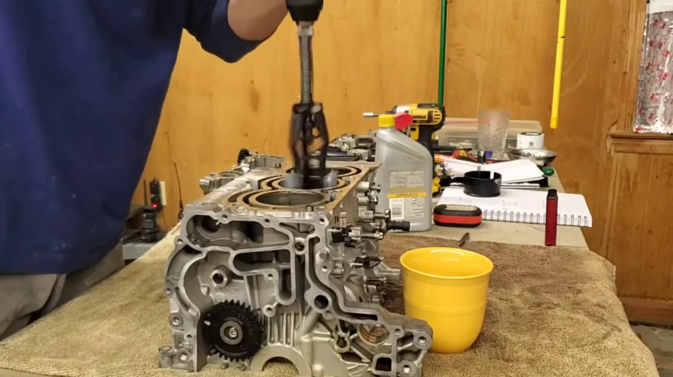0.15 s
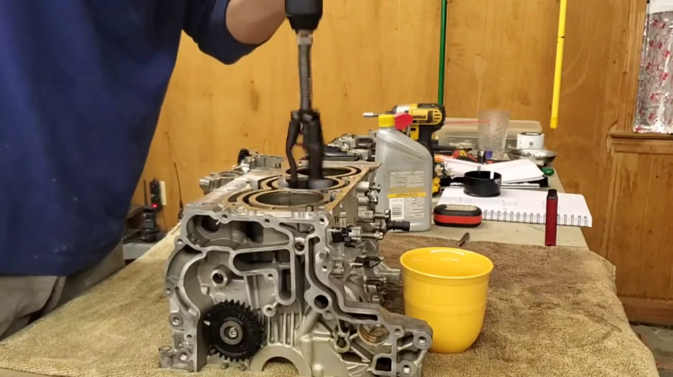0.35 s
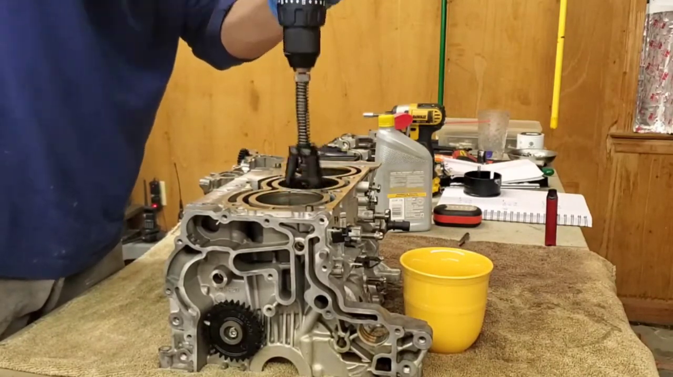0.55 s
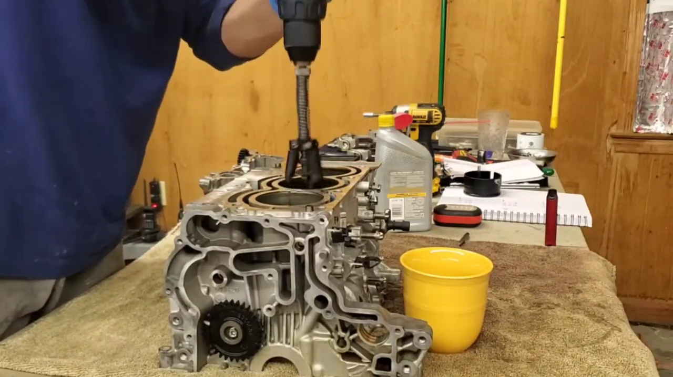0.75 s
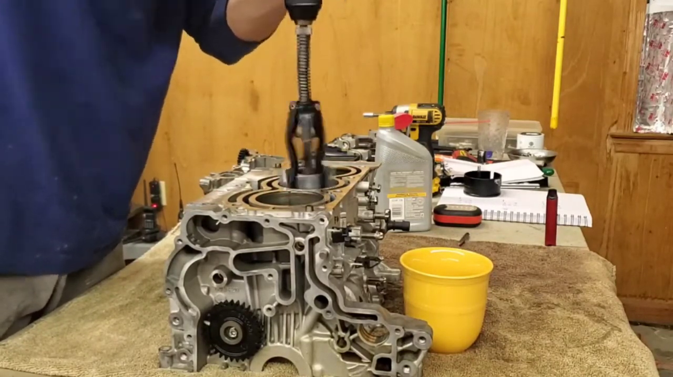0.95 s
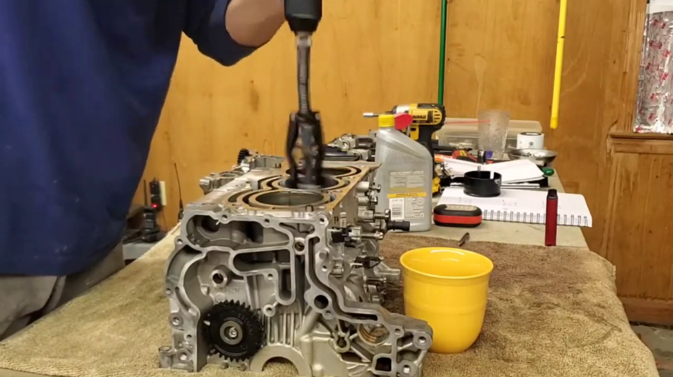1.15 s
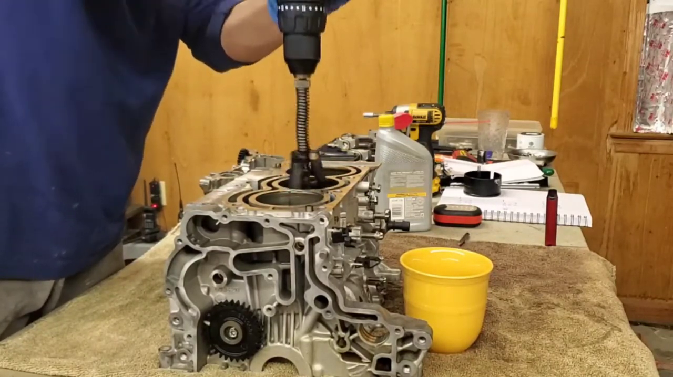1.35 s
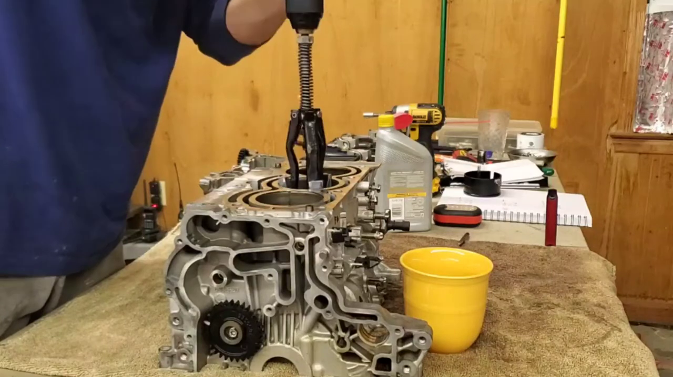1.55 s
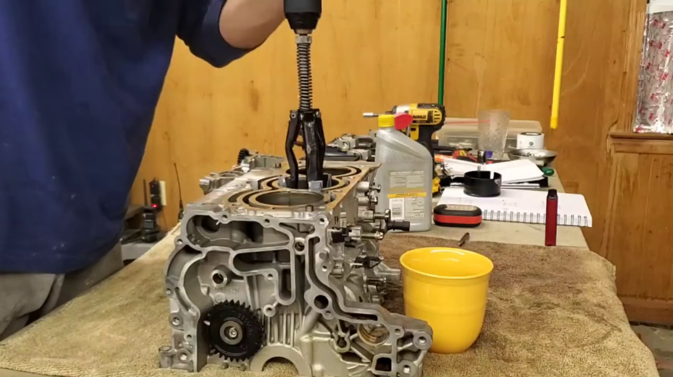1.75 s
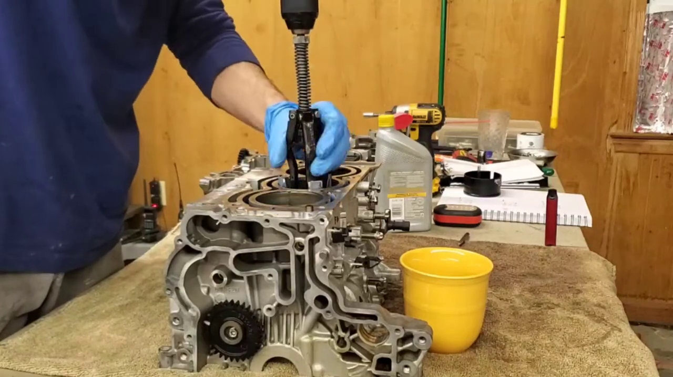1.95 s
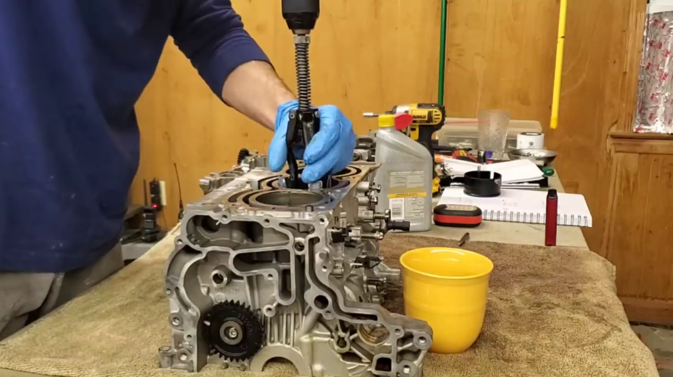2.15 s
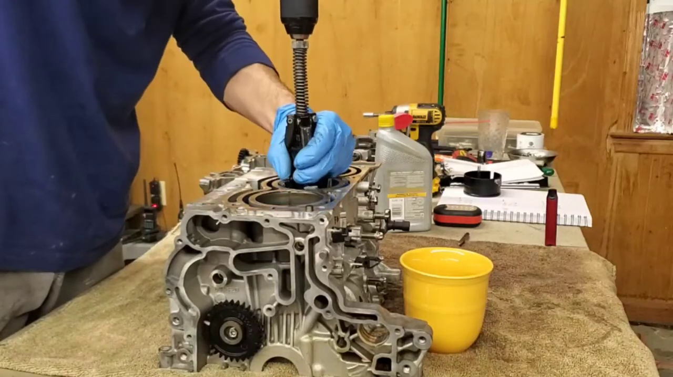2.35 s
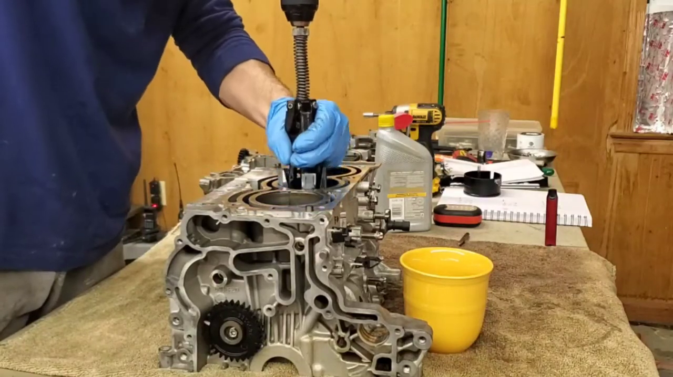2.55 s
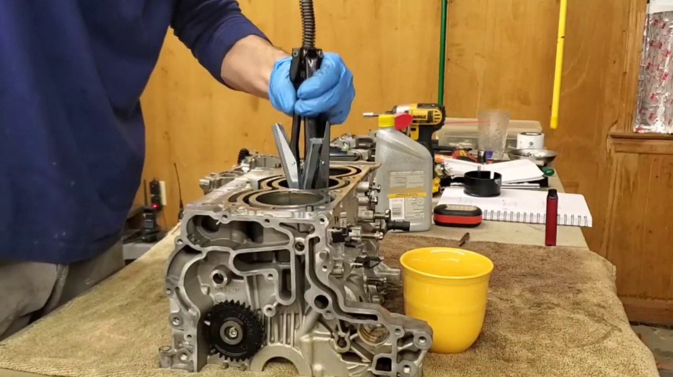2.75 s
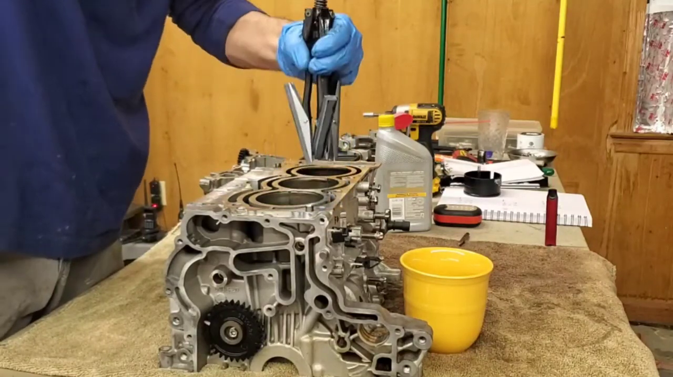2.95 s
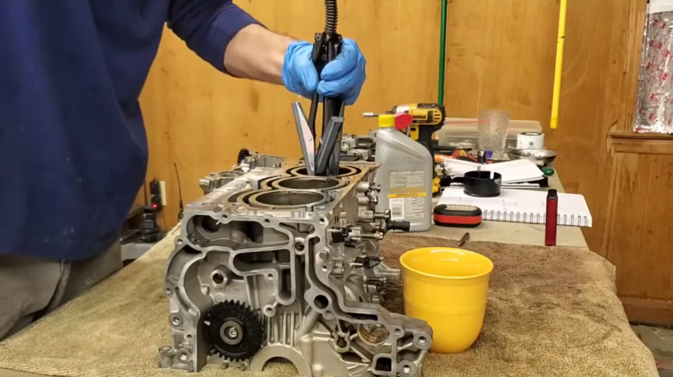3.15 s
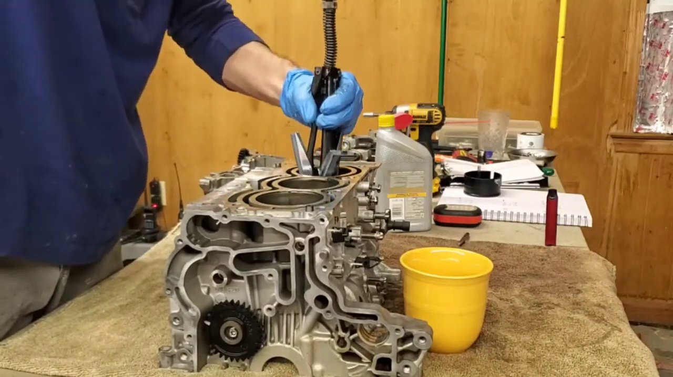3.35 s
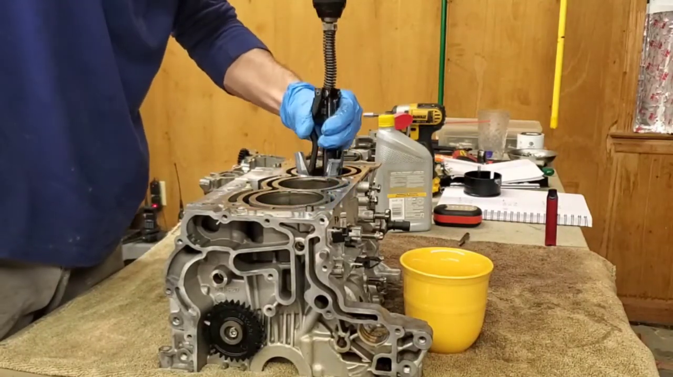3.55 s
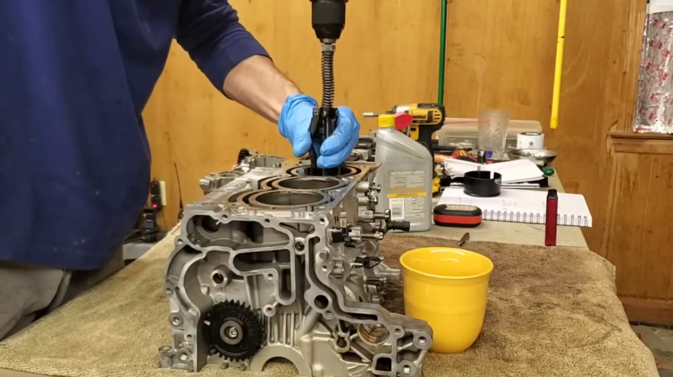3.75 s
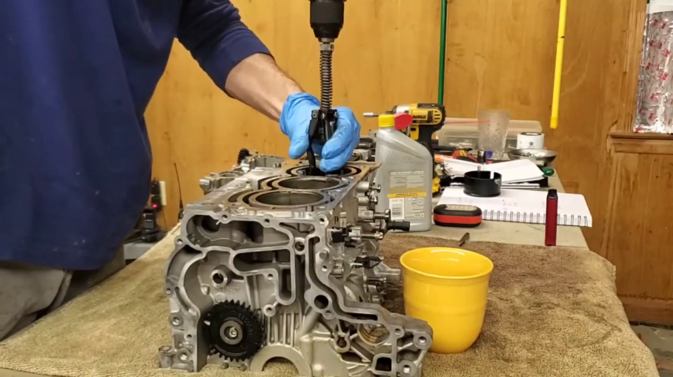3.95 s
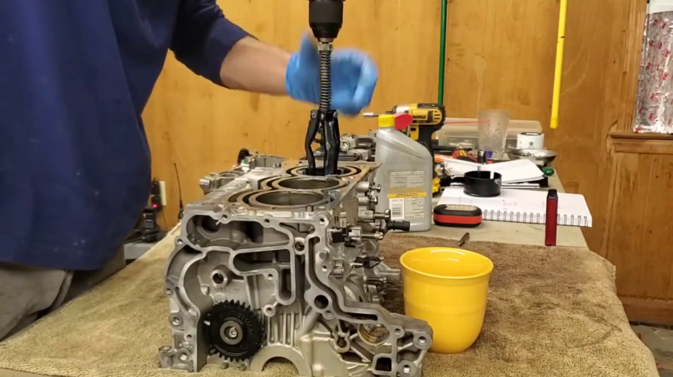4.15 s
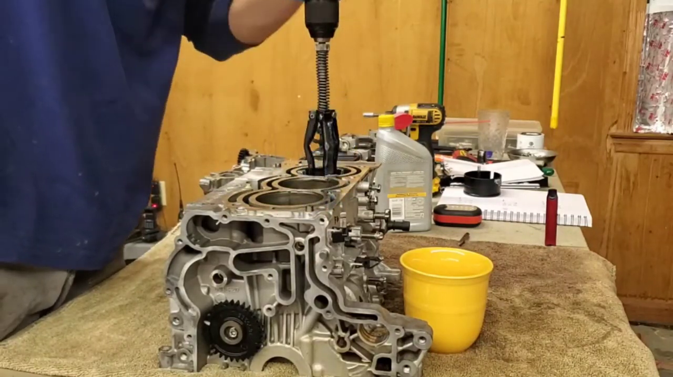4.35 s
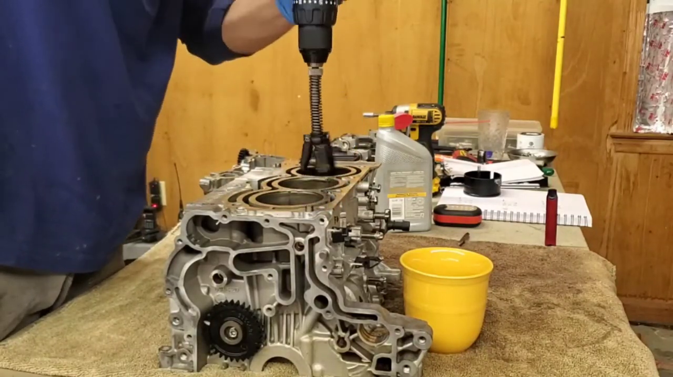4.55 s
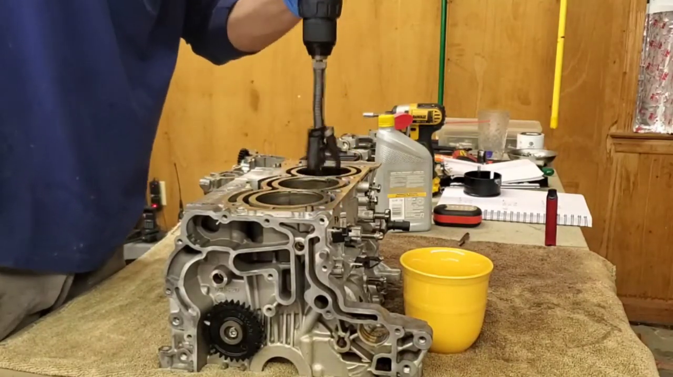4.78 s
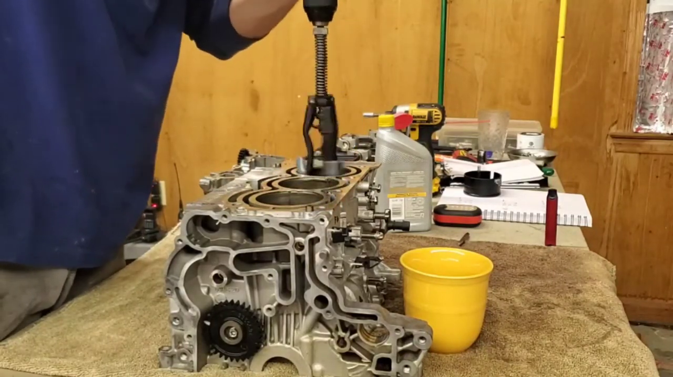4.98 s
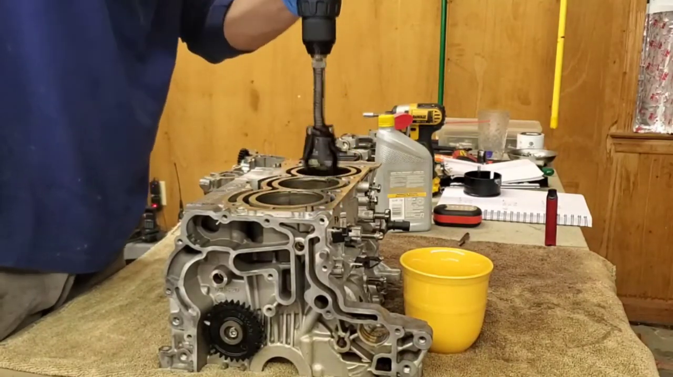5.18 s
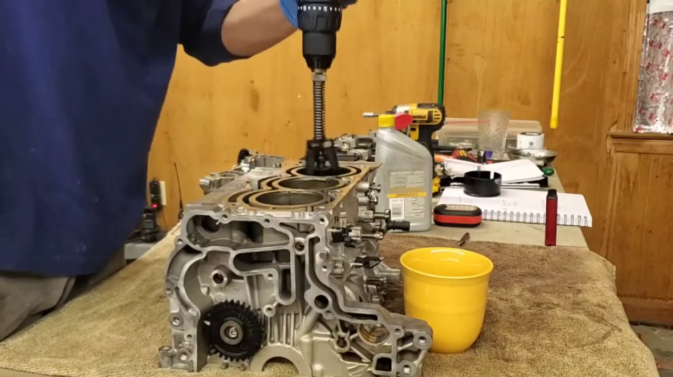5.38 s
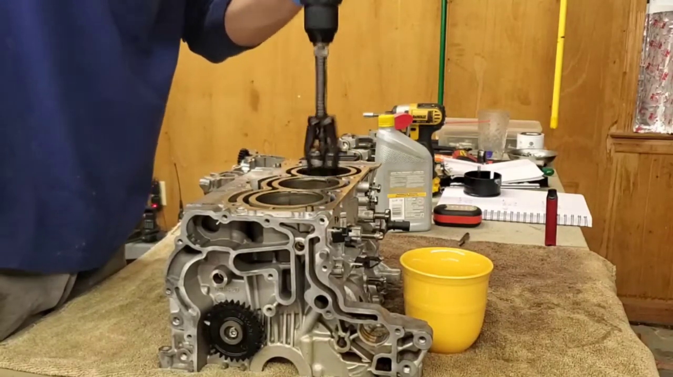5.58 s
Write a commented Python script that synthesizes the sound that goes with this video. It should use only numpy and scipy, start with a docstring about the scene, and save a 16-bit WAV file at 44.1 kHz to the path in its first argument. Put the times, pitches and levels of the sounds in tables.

```python
"""A cordless drill is already spinning a three-stone hone in an oiled cylinder bore: motor and gears whine,
swelling with each stroke, the stones grind in time with the chuck and now and then squeak.
The drill brakes; a gloved hand squeezes the sprung arms and moves the hone to the next bore with swishes,
hisses, steel knocks and a dull thump; then the drill starts again. Tones follow the motor's turns, rubbing
is shaped noise, and steel is a set of ringing modes. Mains hum fills the small workshop throughout."""
import sys
import numpy as np
from scipy import signal
from scipy.fft import rfft, irfft
from scipy.io import wavfile
from scipy.ndimage import uniform_filter1d

SR = 44100
rng = np.random.default_rng(int(sys.argv[2]) if len(sys.argv) > 2 else 0)


def transcribe(signal):
    """Save signal, clipped to [-1, 1], as a 16-bit WAV file at the path in sys.argv[1]."""
    frames = np.atleast_2d(signal).T
    limited = np.clip(frames, -1, 1)
    pcm = np.round(limited * 32767).astype(np.int16)
    wavfile.write(sys.argv[1], SR, pcm)


N = 247842
T = np.arange(N) / SR  # time in seconds

# how the steel arms of the hone ring when free: pitch_hz, relative level_db, time to fade by 60 dB t60_s
ARM_MODES = [(1340, -21, 0.31), (2547, -5, 0.076), (2720, -7.5, 0.069), (3840, -4, .06), (4256, 1.5, 0.071),
             (4370, -3.5, 0.068), (4660, 2, 0.047), (5260, -2, 0.033), (6520, -7, 0.064), (8130, 4, 0.039),
             (8370, -3.5, 0.063), (10940, -14, 0.075), (13190, -10, 0.048)]


def undb(db):
    """Decibels to gain."""
    return 10 ** (np.asarray(db) / 20)


def unit(x):
    """Scale to rms 1."""
    return x / np.sqrt(np.mean(x ** 2))


def noise():
    """White noise."""
    return rng.standard_normal(N)


def walk(rate):
    """A smooth random wander of rms 1, changing about rate times a second."""
    k = max(int(SR / rate), 2)
    steps = np.repeat(rng.standard_normal(N // k + 1), k)
    smooth = uniform_filter1d(uniform_filter1d(steps, k), k)
    return unit(smooth[:N])


def swell(start, length):
    """A rounded hump in time."""
    return np.sin(np.pi * np.clip((T - start) / length, 0, 1))


def colour(x, points):
    """Shape x with a spectrum of (Hz, dB) points, at rms 1."""
    hz, db = np.transpose(points)
    f = np.maximum(np.arange(N // 2 + 1) * SR / N, 1)
    gain = undb(np.interp(np.log(f), np.log(hz), db))
    return unit(irfft(rfft(x) * gain, N))


def tilted(points, tilt_db, pivot_hz):
    """A spectrum made brighter or duller by tilt_db per octave."""
    return [(hz, db + tilt_db * np.log2(hz / pivot_hz)) for hz, db in points]


def resonate(x, hz, width):
    """One resonance, gain 1 at its centre."""
    return signal.lfilter(*signal.iirpeak(hz, hz / width, fs=SR), x)


def narrow(x, hz, width):
    """A resonance applied twice for steep flanks, at rms 1."""
    return unit(resonate(resonate(x, hz, width), hz, width))


def grit(scatter_db, count=12):
    """Dense abrasive grains of very unequal size, each count samples long."""
    size = undb(scatter_db * np.minimum(rng.exponential(size=N // count + 1), 5))
    return unit(noise() * np.repeat(size, count)[:N])


def drill():
    """Shaft tones, gear lines and whine follow the motor; each stroke loads it and swings the tones past the listener."""
    # pulls of the trigger: on_s, off_s, motor turns per second full_hz, grinding level_db,
    # grinding rise in dB per s, shaft tone level_db, its octave level_db, whine level_db
    bursts = [(-0.2, 1.46, 382.3, -31, 0.63, -45.8, -45, -40),
              (4.376, 5.8, 389.3, -30, -0.3, -49.5, -45, -40)]
    # the hand pumps the hone up and down, one row per pull: a moment at the bottom_s, stroke period_s,
    # lag_s until the shaft tones are loudest, lobes of the whine passed per stroke (count)
    strokes = [(0.04, 0.277, 0.03, 4), (4.57, 0.287, 0.145, 3)]
    # motor and gear lines: multiple of the motor turn, level_db relative to the grinding, phase wander_rad
    gear_lines = [(0.45, -39, .5), (2.97, -28, 0.18), (3.953, -23.5, 0.13), (4.39, -22.5, 0.98),
                  (4.99, -14, .25), (8.674, -15.5, 0.99), (10.14, -22.5, 0.27), (10.75, -17.5, 0.8),
                  (15.58, -27.5, .4), (15.92, -30, .4), (23.22, -16.5, 0.44), (24.3, -28, 0.35),
                  (29.58, -26.5, 0.36), (36.1, -16, 0.18), (39.7, -21.5, .2)]
    sag_hz = 1.428  # the motor turns this much slower at the bottom of a stroke, faster at the top
    grind_law, shaft_law, whine_law = 0.79, 1.8, 12  # gains grow as these powers of the speed
    shaft_swing_db, octave_swing_db = 3, 2.5  # swells within a stroke
    whine_swing_db, whine_lobe_db, whine_flicker = 1.5, 3, 0.3
    # near full speed the stones are flung against the wall and grind louder
    fling_db, fling_law = 2.5, 7
    shaft_cut_hz = 170  # the small housing radiates little below this
    wander, whine_order = .13, 18  # phase wander in rad; whine cycles per motor turn

    burst = np.searchsorted([row[0] for row in bursts[1:]], T)
    on, off, full_hz, grind_db, rise_db, shaft_db, octave_db, whine_db = np.array(bursts)[burst].T
    bottom, period, lag, lobes = np.array(strokes)[burst].T
    speed = throttle(on, off)
    stroke = 2 * np.pi * (T - bottom) / period
    unsteady = 1 + .0007 * walk(60) + .0005 * walk(12)
    hz = speed * (full_hz - sag_hz * np.cos(stroke)) * unsteady
    turns = np.cumsum(hz) / SR

    def line(multiple, wander, flutter_db):
        """One tone locked to the motor, with a wandering phase and level."""
        tone = np.sin(2 * np.pi * multiple * turns + wander * walk(110))
        return np.sqrt(2) * tone * unit(undb(flutter_db * walk(25)))

    gears = sum(undb(db) * line(multiple, drift, flutter_db=3.0) for multiple, db, drift in gear_lines)
    facing = np.cos(stroke - 2 * np.pi * lag / period)
    shaft = undb(shaft_db + shaft_swing_db * facing) * line(1, wander, flutter_db=2.0)
    octave = undb(octave_db + octave_swing_db * facing) * line(2, wander, flutter_db=2.74)
    # the whine beams from the vents in lobes, the strongest at the bottom of the stroke
    beam = undb(whine_db + whine_swing_db * np.cos(stroke) + whine_lobe_db * np.cos(lobes * stroke))
    flicker = 1 + whine_flicker * walk(70)
    whine = beam * unit(line(whine_order, wander, flutter_db=2.04) * flicker)
    load_db = grind_db + rise_db * (T - on) - fling_db * (1 - speed ** fling_law)
    load = undb(load_db) * speed ** grind_law
    tones = load * speed * gears + speed ** shaft_law * (shaft + octave) + speed ** whine_law * whine
    housing = signal.butter(2, shaft_cut_hz, "high", fs=SR, output="sos")
    return load * grinding(turns) + signal.sosfilt(housing, tones)


def throttle(on, off):
    """Share of full speed: the motor spins up when the trigger is pulled and brakes when it is let go."""
    spin_up_s, brake_s = 0.032, 0.022  # time constants
    rise = 1 - np.exp(-np.maximum(T - on, 0) / spin_up_s)
    return rise * np.exp(-np.maximum(T - off, 0) / brake_s)


def grinding(turns, gear_ratio=27, chuck_db=0.5, wobble_db=1.0, stones_db=1.0, chatter_db=1.2, mesh_db=0.08):
    """Three stones drag round the bore; their pressure throbs with the chuck, and the gears rattle with the motor."""
    # colour of the stones' rasp: pitch_hz, relative level_db per Hz
    stone_colour = [(30, -38), (100, -24), (220, -18), (330, -12), (450, -5.5), (620, -7.5), (900, -2),
                    (1300, -7.5), (1700, -2), (3900, -2), (4800, -5.5), (6400, -7), (7300, -13),
                    (8600, -6.5), (10500, -9), (13200, -11), (14200, -14.5), (15800, -18.5)]
    # ringing of gearbox and bore under the grinding: pitch_hz, width_hz, relative level_db
    body_rings = [(3350, 220, -8), (3993, 130, -19), (8990, 460, -16.5)]
    chuck = 2 * np.pi * turns / gear_ratio + 0.2 * walk(6.6)
    # once, twice and three times per chuck turn
    throb_db = chuck_db * np.sin(chuck) + wobble_db * np.sin(2 * chuck) + stones_db * np.sin(3 * chuck)
    mesh = mesh_db * np.sin(2 * np.pi * turns)
    pressure = unit(undb(throb_db + chatter_db * walk(220) + mesh))
    rasp = colour(grit(scatter_db=1.5) * pressure, stone_colour)
    low = signal.sosfiltfilt(signal.butter(4, 7000, fs=SR, output="sos"), rasp)
    hiss = rasp - low
    ring = 0
    for hz, width, db in body_rings:
        ring = ring + undb(db) * unit(resonate(grit(scatter_db=0.0) * pressure ** 2, hz, width))
    return undb(-4.5) * unit(low) + ring + undb(-8) * unit(hiss)


def squeaks():
    """Brief stick-slip tones of a stone on the bore wall, and one brief ring of the arms knocking as the drill
    starts."""
    # brief tones: start_s, length_s, pitch_hz, level_db, octave level_db, double octave level_db; a stone
    # sticks and slips on the bore wall, except the row at 4.381 s, where the arms ring with a knock as the
    # drill starts
    brief_tones = [(0.173, 0.0077, 2640, -23.5, -19.5, -28.5), (0.179, 0.0082, 2615, -38, -20, -28),
                   (1.043, 0.009, 2585, -29, -52, -61), (1.172, 0.014, 2663, -25.5, -42, -55),
                   (4.381, 0.029, 2560, -41.5, -48, -65), (4.822, 0.014, 2516, -29.5, -51, -62)]
    out = 0
    for s, length, hz, *partials_db in brief_tones:
        phase = 2 * np.pi * hz * T + .25 * walk(300)
        tone = sum(undb(db) * np.sin(2 ** k * phase) for k, db in enumerate(partials_db))
        out = out + np.sqrt(2 * swell(s, length)) * tone
    return out


def jolts():
    """On braking and starting the gears growl in a short rough glide as they take up their play."""
    # growls: start_s, length_s, first pitch_hz, last pitch_hz, level_db
    growls = [(1.456, 0.019, 1138, 717, -33.5), (4.382, 0.0253, 740, 1030, -41)]
    out = 0
    for s, length, first_hz, last_hz, db in growls:
        glide = np.interp(T, [s, s + length], [first_hz, last_hz]) * (1 + 0.032 * walk(500))
        growl = unit(np.sin(2 * np.pi * np.cumsum(glide) / SR))
        out = out + undb(db) * swell(s, length) * growl
    return out


def sleeve(fold_db=2.3):
    """Cloth swishes in a few hollow resonances that come and go as the folds shift."""
    # the arm reaches down and goes back: start_s, length_s, level_db, tilt_db per octave
    swishes = [(1.815, 0.22, -72, 3), (1.97, 0.22, -72.5, -12), (3.793, 0.35, -68, 1.5),
               (4.15, 0.13, -70.5, 7.5)]
    # the folds: pitch_hz, width_hz of each of three filter passes, relative level_db
    cloth = [(506, 120, 1), (840, 330, 0.5), (1130, 520, -6.5), (1890, 250, -25.5)]
    hz, _, mode_db = np.transpose(cloth)
    folds = []
    for f, width, _ in cloth:
        hollow = narrow(resonate(noise(), f, width), f, width)
        folds.append(hollow * undb(fold_db * walk(30)))
    folds = np.array(folds)
    out = 0
    for s, length, db, tilt_db in swishes:
        swish = unit(undb(mode_db + tilt_db * np.log2(hz / 800)) @ folds)
        out = out + undb(db) * np.sqrt(swell(s, length)) * swish
    return out * undb(1.5 * walk(120))


def handling(rub_width=15, favour_db=12, favour_hz=220):
    """The glove hisses on the hone, sliding steel sings in the arms' modes, the block rocks."""
    # the hone slides in the glove and along the bore: start_s, length_s,
    # rubber hiss level_db, steel ringing level_db, favoured pitch_hz
    slide_moves = [(1.885, 0.14, -86.5, -99, 4410), (2.235, 0.093, -68, -73.5, 2514),
                   (2.348, .05, -72, -68, 5200), (2.385, 0.069, -82.5, -72.5, 4300),
                   (2.464, 0.09, -72.5, -74, 8600), (2.541, 0.085, -76.5, -76, 4460),
                   (2.644, 0.075, -79, -73, 6500), (3.377, .15, -88, -81, 6500),
                   (3.579, 0.28, -91.5, -83, 4440), (3.869, 0.082, -78, -74, 2550),
                   (4.045, 0.091, -79, -97.5, 4400), (4.235, .06, -84.5, -98, 4370)]
    # dull thumps as the block rocks on the bench: start_s, length_s, pitch_hz, level_db
    bench_thumps = [(3.149, 0.26, 65, -76), (4.56, 0.12, 95, -62)]
    rubber = colour(grit(scatter_db=2.0), [(200, -21.5), (1500, 2), (2600, -4), (3300, -11), (5300, 6),
                                           (7000, -4), (9000, 9.0), (13000, 7.5), (15500, -14)])
    rub = grit(scatter_db=1.0)
    hz, mode_db, t60 = np.transpose(ARM_MODES)
    # the grip damps the arms, so their modes are wider than when they ring free
    modes = np.array([narrow(rub, f, width) for f, width in zip(hz, rub_width / t60)])
    slides = 0
    for s, length, hiss_db, ring_db, main_hz in slide_moves:
        # the point of contact decides which modes are favoured
        favour = favour_db * np.exp(-((hz - main_hz) / favour_hz) ** 2)
        steel = unit(undb(mode_db + favour) @ modes)
        slides = slides + swell(s, length) * (undb(hiss_db) * rubber + undb(ring_db) * steel)
    thumps = 0
    for s, length, f, db in bench_thumps:
        thumps = thumps + undb(db) * swell(s, length) * narrow(noise(), f, 1.1 * f)
    return slides * undb(2.0 * walk(120)) + thumps


def knocks(tick_s=0.0031, detune=0.016):
    """Each knock and its one bounce ring three slightly unlike steel arms and add a short dry tick."""
    # the arms knock on their stops and the bore: start_s, level_db,
    # tilt_db per octave (lower is duller), dry tick_db relative to the ring
    hits = [(2.368, -56.5, 12, -7), (2.408, -59, -2, 3), (2.607, -60, 1, -3), (2.614, -38, 5.5, -4),
            (2.683, -52, 1.5, 3), (3.437, -73.5, -5.5, 1), (3.710, -60, -10.5, -6), (3.779, -42.5, -5, -6)]
    bounce_s, bounce_db = 0.008, -15
    pivot_hz = 4500
    tick_colour = [(100, -21), (1000, -15), (4500, 3), (9000, -9.5), (15000, -12)]
    out, t = np.zeros(N), T[:SR // 3]
    hz, mode_db, t60 = np.repeat(ARM_MODES, 3, axis=0).T[:, :, None]
    hz = hz * (1 + detune * rng.standard_normal(hz.shape))
    onset = 1 - np.exp(-t / 0.00023)
    for s, db, tilt_db, tick_db in hits:
        tick = colour(noise(), tilted(tick_colour, tilt_db, pivot_hz))
        gain = undb(mode_db + tilt_db * np.log2(hz / pivot_hz))
        for start, strength_db in [(s, db), (s + bounce_s, db + bounce_db)]:
            at = slice(int(start * SR), int(start * SR) + len(t))
            phase = 2 * np.pi * (hz * t + rng.random(hz.shape))
            fade = np.exp(-np.log(1000) * t / t60)
            ring = np.sum(gain * np.sin(phase) * fade, axis=0) / np.sqrt(np.sum(gain ** 2))
            dry_tick = undb(tick_db) * tick[at] * np.exp(-t / tick_s)
            out[at] += undb(strength_db) * (ring + dry_tick) * onset
    return out


def room(x, wet_db=-10, split_hz=6500):
    """A short tail from the panelled walls, dying sooner in the treble."""
    t = T[:SR // 2]
    t60_low, t60_high = .21, .13  # seconds to fade by 60 dB
    scatter = rng.standard_normal(len(t))
    low = signal.sosfiltfilt(signal.butter(3, split_hz, fs=SR, output="sos"), scatter)
    tail = low * undb(-60 * t / t60_low) + (scatter - low) * undb(-60 * t / t60_high)
    tail = tail * (t > .005)  # the tail starts after 5 ms
    tail = signal.sosfilt(signal.butter(1, 1200, "high", fs=SR, output="sos"), tail)
    return x + undb(wet_db) * signal.fftconvolve(x, tail / np.sqrt(np.sum(tail ** 2)))[:N]


def workshop():
    """Mains buzz on exact multiples of the line frequency, over still air."""
    # buzz: rough pitch_hz (moved to the nearest mains multiple), level_db before a 1 dB lift
    hum_lines = [(177.6, -73.5), (242.2, -81.5), (301.5, -87.5), (360.7, -79), (479.1, -90.5),
                 (602.9, -102), (721.4, -100), (839.8, -99), (1082, -100)]
    # colour of the still air: pitch_hz, relative level_db per Hz
    air_colour = [(25, -14), (65, -3), (120, -7), (250, -2), (450, -8.5), (700, -21), (1500, -23),
                  (4000, -29.5), (8000, -37.5), (15000, -30.5)]
    mains_hz, air_db = 60, -76.5
    hum = 0
    for hz, db in hum_lines:
        multiple = np.round(hz / mains_hz)
        phase = 2 * np.pi * (multiple * mains_hz * T + rng.random()) + .05 * walk(7.8)
        hum = hum + np.sqrt(2) * undb(db) * np.sin(phase)
    return undb(1.0) * hum + undb(air_db) * colour(noise(), air_colour)


def scene():
    """Drill, hone and hands in the humming workshop."""
    work = drill() + squeaks() + jolts() + sleeve() + handling() + knocks()
    return (room(work) + workshop())[None]


def record(dry):
    """The microphone chain cuts the top steeply."""
    top_hz = 15750
    return signal.sosfilt(signal.ellip(12, .1, 90, top_hz, fs=SR, output="sos"), dry)


dry = scene()
out = record(dry)
transcribe(out)
```